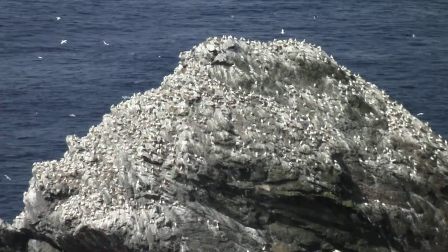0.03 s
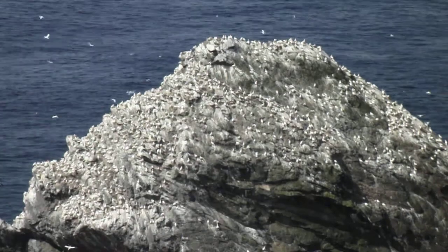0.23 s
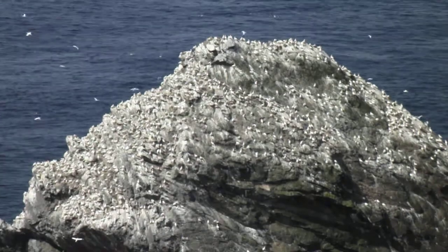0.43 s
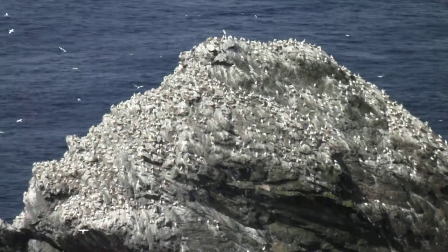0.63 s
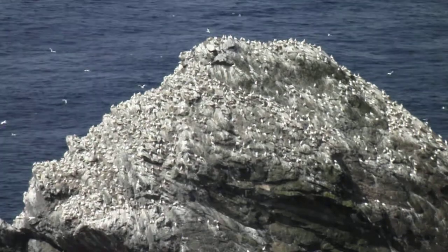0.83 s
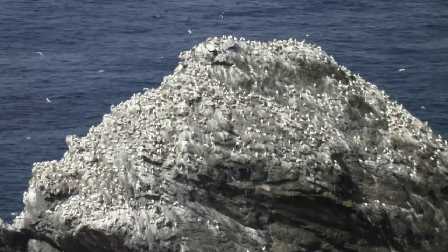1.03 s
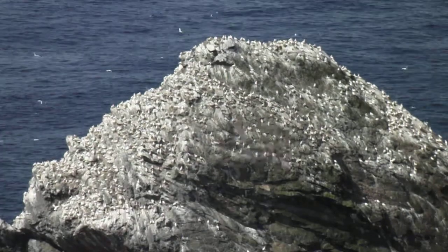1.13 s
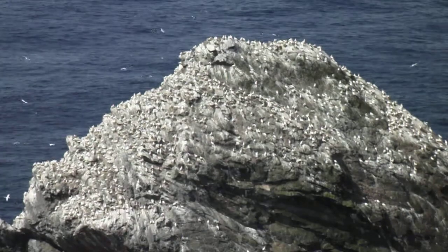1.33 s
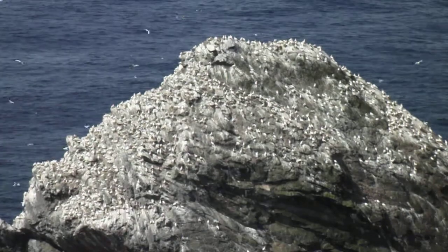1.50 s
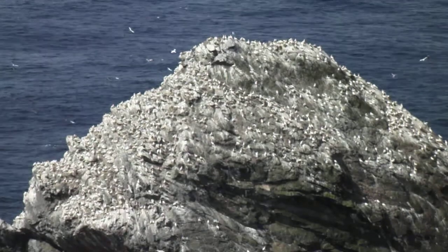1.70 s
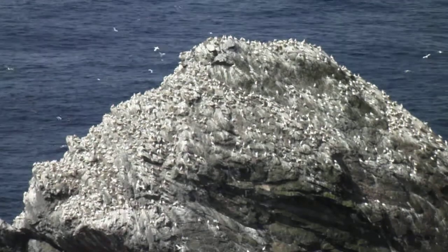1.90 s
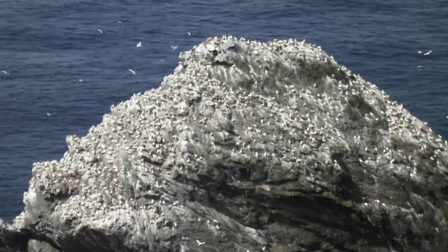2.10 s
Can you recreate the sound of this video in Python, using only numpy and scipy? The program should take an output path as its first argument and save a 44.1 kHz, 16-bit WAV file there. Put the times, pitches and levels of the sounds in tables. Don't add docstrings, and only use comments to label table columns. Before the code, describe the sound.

Wind buffets a small microphone in deep lumps, over a faint far seabird colony and surf

```python
import sys
import numpy as np
from scipy import signal
from scipy.fft import rfft, irfft, next_fast_len
from scipy.io import wavfile
from scipy.ndimage import uniform_filter1d, map_coordinates

SR = 44100
rng = np.random.default_rng(int(sys.argv[2]) if len(sys.argv) > 2 else 0)


def bounce(signal):
    frames = np.transpose(np.atleast_2d(signal))
    limited = np.clip(frames, -1, 1)
    pcm = np.round(limited * 32767).astype(np.int16)
    wavfile.write(sys.argv[1], SR, pcm)


def magnitude_from_level(level_db):
    exponent = np.asarray(level_db, float) / 20
    return 10 ** exponent


N = 94815
TIME = np.arange(N) / SR

# [t/s, level/dB]
GUST_STRENGTH = [(0, -36), (.12, -31.5), (.33, -17.5), (.43, -22.5), (.54, -12.5), (.68, -25), (.81, -9.5),
                 (.885, -6.5), (.93, -27.5), (1.02, -10.5), (1.14, -18.5), (1.21, -11.5), (1.33, -31),
                 (1.41, -17), (1.52, -24), (1.57, -20.5), (1.87, -26), (2.15, -37)]
# [f/Hz, density/dB]
THUD_SPECTRUM = [(9, 10), (14, 0.5), (22, 4), (34, -1), (50, -12.5), (70, -44), (110, -44)]
# [f/Hz, density/dB]
FLUTTER_SPECTRUM = [(30, -15), (50, 4.5), (80, -12.5), (120, -29.5), (200, -32), (300, -43)]
# [t/s, peak level/dB, f/Hz]
ROLLING_EDDIES = [(0.036, -30, 29.6), (0.087, -27.5, 31.2), (0.128, -21, 33.7), (.25, -25, 28.5),
                  (0.949, -19.5, 36), (0.216, -19.5, 41), (0.301, -21.5, 32.4), (.34, -20.5, 33),
                  (.39, -18.5, 26), (0.461, -20, 42.5), (0.538, -11.5, 26), (0.598, -32, 29.7),
                  (0.781, -9.5, 25.3), (0.816, -8, 39), (0.868, -8, 27), (0.906, -12.5, 29.7),
                  (1.025, -10, 34.6), (1.089, -14.5, 28.1), (1.18, -18, 34), (1.224, -16, 36),
                  (1.409, -11.5, 28), (1.478, -16.5, 28), (1.571, -14, 33.3), (1.628, -24.5, 34.6),
                  (1.7, -20.5, 36.3), (1.851, -22, 28.4), (1.89, -20.5, 31.5), (2.069, -30.5, 31.2)]
# [t/s, peak level/dB, f/Hz]
BURSTING_EDDIES = [(.2, -21.5, 65), (0.071, -42, 69.6), (0.111, -34, 74), (0.34, -23.5, 59.7),
                   (0.452, -20, 54.6), (0.493, -13.5, 79.6), (0.6, -29, 129), (0.69, -34.5, 87),
                   (0.832, -22, 102), (0.881, -12, 68.5), (0.991, -26.5, 85), (1.015, -11.5, 55.8),
                   (1.046, -27.5, 125), (1.092, -22, 68), (1.161, -30, 84), (1.21, -25.5, 62),
                   (1.402, -24, 67.6), (1.558, -18.5, 66), (1.939, -30, 65)]
# [f/Hz, density/dB]
SURF_SPECTRUM = [(59, -39), (100, -0.5), (279, -7), (402, -8), (618, -10.5), (683, -9), (1400, -15),
                 (1820, -37), (3080, -120)]
# [t/s, level/dB]
CHORUS_LEVEL = [(0.0, -39), (0.23, -42), (0.35, -38), (0.39, -41), (0.62, -40), (0.63, -44), (.7, -42),
                (.78, -40), (1.12, -40.5), (1.2, -41), (1.31, -42), (1.71, -40.5), (2.15, -42.5)]
# [f/Hz, density/dB]
VOICE_SPECTRUM = [(800, -61), (1150, -22.5), (1350, -3.5), (1700, -2), (3100, -3), (3500, -7.5),
                  (4200, -18), (6500, -38)]
# [f/Hz, width/Hz, lift/dB]
THROAT_RESONANCES = [(988, 253, 33), (2230, 95, 3.5), (3200, 650, 5)]
# [t/s, level/dB]
MURMUR_LEVEL = [(0, -61), (.1, -46.5), (.23, -48), (.27, -52.5), (.34, -43.5), (.52, -49), (.61, -42.5),
                (.66, -54.5), (.73, -42.5), (.8, -65), (.95, -51.5), (1.12, -55), (1.2, -43.5), (1.35, -50),
                (1.4, -54), (1.53, -45), (1.65, -49.5), (2.15, -50.5)]
# [multiple of the motor's rate, rms level/dB]
MOTOR_ORDERS = [(7, -69), (14, -90), (19, -85), (20, -84), (22, -79), (23, -84), (24, -83)]
# [f/Hz, rms level/dB]
WHINE_TONES = [(11472, -74)]
# [f/Hz, density/dB]
CASE_SPECTRUM = [(3500, 11), (5200, -13), (7300, -11), (7700, 6.5), (8300, 5.5), (8600, 0), (9600, 5),
                 (10000, -4)]
# [t/s, peak level/dB, f/Hz, length/s]
SINGLE_CALLS = [(0.059, -44, 2230, .015), (0.274, -39, 2430, 0.027), (0.332, -42, 2900, 0.011),
                (0.337, -38, 3200, 0.018), (0.328, -36.5, 1880, 0.014), (0.377, -47, 2330, 0.012),
                (0.366, -44, 3200, 0.024), (0.028, -47, 2970, 0.046), (.1, -52, 3200, 0.032),
                (0.506, -43, 1766, 0.019), (0.554, -40, 2380, 0.012), (0.604, -39.5, 3200, 0.016),
                (1.101, -43, 3200, 0.045), (1.132, -32.5, 3190, 0.014), (1.201, -41.5, 3190, 0.022),
                (1.392, -42, 2750, 0.039), (1.454, -35, 2770, .008), (1.456, -36.5, 2400, 0.007),
                (1.647, -48, 2120, .014), (1.66, -42, 2360, .014), (1.728, -48, 2200, 0.0099),
                (1.18, -44, 3120, 0.023), (1.435, -46, 2950, .014), (1.542, -44, 2950, 0.011),
                (1.661, -37, 2340, 0.021), (1.674, -36, 2200, 0.012), (1.682, -40, 2020, .01),
                (1.711, -40, 2230, 0.0076), (1.743, -37.5, 2315, 0.023), (1.745, -39, 2700, 0.0095),
                (1.766, -36.5, 1480, 0.014), (1.352, -40.5, 1467, 0.029), (1.792, -45, 3300, 0.01),
                (1.776, -46, 2325, 0.02), (1.93, -39, 2200, .015)]
# [t/s, length/s, level/dB]
GRASS_RUSTLES = [(0.045, 0.048, -56), (0.128, 0.083, -55.5), (0.176, 0.041, -57), (0.317, .03, -59),
                 (0.345, 0.03, -52), (0.367, .02, -54), (0.384, .02, -57), (0.442, 0.035, -53.5),
                 (.47, 0.044, -56), (0.542, 0.022, -53.5), (0.645, .02, -65), (0.757, .03, -52.5),
                 (.895, .03, -55.5), (.945, 0.011, -56), (1.025, .02, -54)]
# [f/Hz, density/dB]
GRASS_SPECTRUM = [(2500, -12), (4200, -7), (5200, -18), (6200, -13), (7200, -23), (8000, -6), (9000, -15),
                  (11000, -26)]
# [t/s, peak level/dB, f/Hz, rebound level/dB, knock level/dB]
STEM_SNAPS = [
    (.0728, -33, 8350, -11, -9),
    (1.0733, -33.5, 8500, -9, -14),
    (1.5507, -29.5, 7900, -4.5, .5),
]
# [ratio to the snap's f, level/dB]
STEM_MODES = [(.86, -4), (1, 0), (1.045, -4), (1.18, -8)]
KNOCK_MODES = 3940, 4400


def unit(x):
    return x / np.sqrt(np.mean(x ** 2) + 1e-20)


def colour(points, hz):
    f, db = np.transpose(points)
    return magnitude_from_level(np.interp(np.log(hz + 1), np.log(f + 1), db, -120, -120))


def curve(rows):
    return np.interp(TIME, *np.transpose(rows))


def wobble(rate):
    return map_coordinates(rng.standard_normal(1200), [np.clip(TIME * rate, 0, 1199)])


def filtered(x, response):
    size = next_fast_len(N + 8192)
    hz = np.fft.rfftfreq(size, 1 / SR)
    return irfft(rfft(x, size) * response(hz), size)[:N]


def rush(spectrum, patchy_db):
    z = signal.stft(rng.standard_normal(N), nperseg=512)[2]
    patches = uniform_filter1d(rng.standard_normal(z.shape), size=5, axis=0)
    patches = uniform_filter1d(patches, size=8, axis=1)
    x = signal.istft(z * magnitude_from_level(patchy_db * unit(patches)), nperseg=512)[1][:N]
    return unit(filtered(x, spectrum))


def envelope(x, size):
    return uniform_filter1d(abs(signal.hilbert(x)), size)


def steady(x, size):
    evenness = .85
    return unit(x / (envelope(x, size) + .1) ** evenness)


def bump(s, length):
    return np.exp(-8 * ((TIME - s) / length) ** 2)


def eddies(rows, cycles, delay_cycles):
    out = np.zeros(N)
    for s, db, hz in rows:
        phase = rng.uniform(0, 2 * np.pi)
        swell = bump(s + delay_cycles / hz, cycles / hz)
        out += magnitude_from_level(db) * swell * np.sin(2 * np.pi * hz * (TIME - s) + phase)
    return out


def wind():
    strength_db = curve(GUST_STRENGTH)
    mean_db = strength_db.mean()
    thud = steady(rush(lambda hz: colour(THUD_SPECTRUM, hz), patchy_db=0), size=600)
    flutter = steady(rush(lambda hz: colour(FLUTTER_SPECTRUM, hz), patchy_db=0), size=1200)
    thud_db = strength_db - 5
    flutter_db = mean_db - 13 + 0.84 * (strength_db - mean_db)
    lumps = eddies(ROLLING_EDDIES, cycles=1.8, delay_cycles=0)
    slaps = eddies(BURSTING_EDDIES, cycles=1.22, delay_cycles=0.61)
    return lumps + magnitude_from_level(thud_db) * thud + magnitude_from_level(flutter_db) * flutter + slaps


def surf():
    level_db = -48.5 + 0.51 * wobble(2.8)
    return magnitude_from_level(level_db) * rush(lambda hz: colour(SURF_SPECTRUM, hz), patchy_db=1.2)


def bird_voice(hz):
    lift_db = sum(db / (1 + (2 * (hz - c) / width) ** 2) for c, width, db in THROAT_RESONANCES)
    return colour(VOICE_SPECTRUM, hz) * magnitude_from_level(lift_db)


def colony():
    count, croak_share = 220, .36
    roll_hz, croak_s, spread_db = 33, .16, 1.5
    draws = rng.standard_normal((count, 4))
    t = np.arange(SR // 4) / SR
    starts = rng.integers(0, N + len(t), count)
    roll = roll_hz * np.exp(0.22 * draws[:, :1]) * t
    pulses = np.exp(-5 * (roll % 1))
    lengths = croak_s * np.exp(0.59 * draws[:, 1:2])
    arch = np.sin(np.pi * np.clip(t / lengths, 0, 1))
    pitch = 2150 * np.exp(.43 * np.tanh(draws[:, 2:3]))
    rasp = uniform_filter1d(rng.standard_normal(roll.shape), size=50, axis=1)
    tone = np.sin(2 * np.pi * pitch * t * (1 - .1 * t))
    calls = magnitude_from_level(spread_db * draws[:, 3:4]) * arch * pulses * rasp * tone
    where = starts[:, None] + np.arange(len(t))
    croaks = np.bincount(where.ravel(), calls.ravel(), N + 2 * len(t))[len(t):][:N]
    croaks = unit(filtered(croaks, lambda hz: np.sqrt(bird_voice(hz))))
    blur = rush(bird_voice, patchy_db=0.5)
    chorus = np.sqrt(1 - croak_share) * blur + np.sqrt(croak_share) * croaks
    return magnitude_from_level(curve(CHORUS_LEVEL) - 1) * chorus


def murmur():
    centre_hz, width_hz = 1490, 72
    band = rush(lambda hz: 1 / (1 + (2 * (hz - centre_hz) / width_hz) ** 2), patchy_db=5.5)
    note = unit(band / envelope(band, 900) ** .5)
    return magnitude_from_level(curve(MURMUR_LEVEL) - 1) * note


def machine_tone(hz, db):
    level = np.sqrt(2) * magnitude_from_level(db + .6 * wobble(5))
    return level * np.sin(2 * np.pi * hz * TIME + .3 * wobble(4))


def camera():
    motor_hz, preamp_hz = 401.1, 9100
    motor = sum(machine_tone(k * motor_hz, db) for k, db in MOTOR_ORDERS)
    whine = sum(machine_tone(hz, db) for hz, db in WHINE_TONES)
    case = magnitude_from_level(-62 + 0.26 * wobble(9)) * rush(lambda hz: colour(CASE_SPECTRUM, hz), patchy_db=0.3)
    preamp = rush(lambda hz: (hz > 900) / np.sqrt(1 + (hz / preamp_hz) ** 2), patchy_db=0.5)
    return motor + whine + case + magnitude_from_level(-58) * preamp


def near_calls():
    sag = 0.6
    calls = np.zeros(N)
    for s, db, hz, length in SINGLE_CALLS:
        t = TIME - s
        calls += magnitude_from_level(db) * bump(s, length) * np.sin(2 * np.pi * hz * t * (1 - sag * t))
    return calls * (1 + .45 * wobble(500))


def grass():
    swells = sum(magnitude_from_level(db) * bump(s, length) for s, length, db in GRASS_RUSTLES)
    grains = magnitude_from_level(1.2 * wobble(150))
    hiss = rush(lambda hz: colour(GRASS_SPECTRUM, hz), patchy_db=1.5)
    return swells * unit(grains * hiss)


def stems():
    t60_s, rise_s, rebound_s = .0075, .0004, .0047
    sag = .98
    out, t = np.zeros(N), TIME[:SR // 50]
    for s, db, hz, rebound_db, knock_db in STEM_SNAPS:
        for k in range(3):
            modes = [(ratio * hz * sag ** k, level) for ratio, level in STEM_MODES]
            modes += [(f, knock_db) for f in KNOCK_MODES]
            ring = sum(magnitude_from_level(level) * np.sin(2 * np.pi * f * t) for f, level in modes) / 2
            fall = magnitude_from_level(db + k * rebound_db - 60 * t / t60_s) * (1 - np.exp(-t / rise_s))
            out[round((s + k * rebound_s) * SR):][:len(t)] += fall * ring
    return out


def scene():
    birds = colony() + murmur() + near_calls()
    return (wind() + surf() + birds + camera() + grass() + stems())[None]


def band_limit(x):
    return signal.sosfilt(signal.butter(12, 16700, fs=SR, output="sos"), x)


def record(dry):
    low_cut_hz, top_hz = 6, 15730
    mix = filtered(dry[0], lambda hz: (hz < top_hz) * hz ** 2 / (hz ** 2 + low_cut_hz ** 2))
    return band_limit(mix[None])


dry = scene()
out = record(dry)
bounce(out)
```